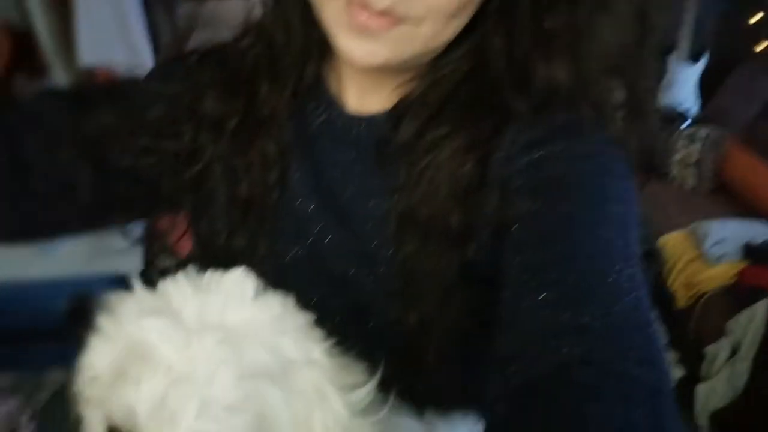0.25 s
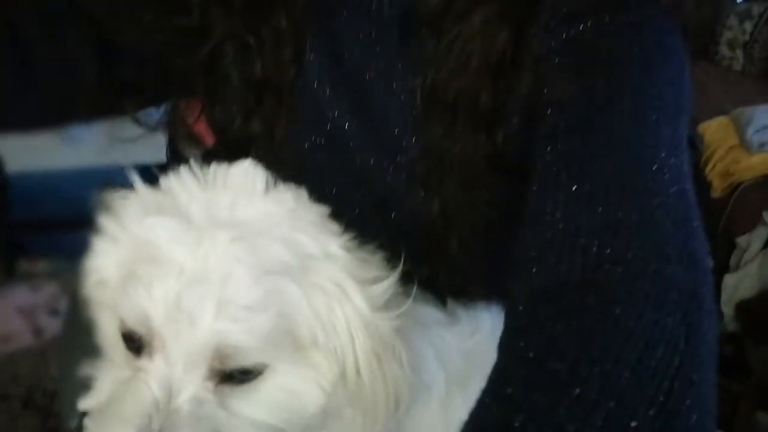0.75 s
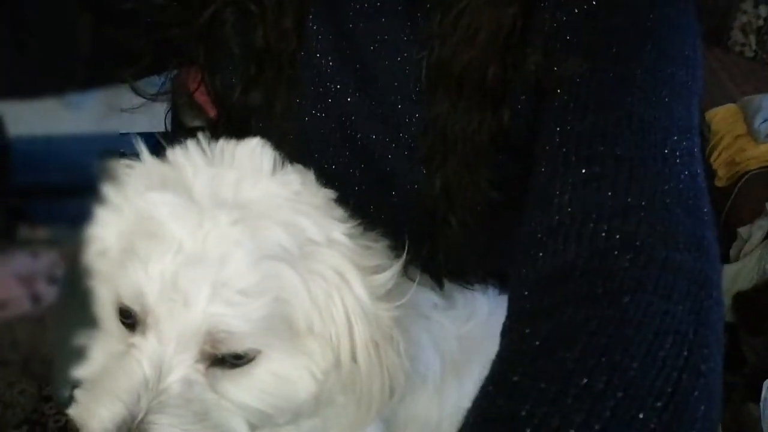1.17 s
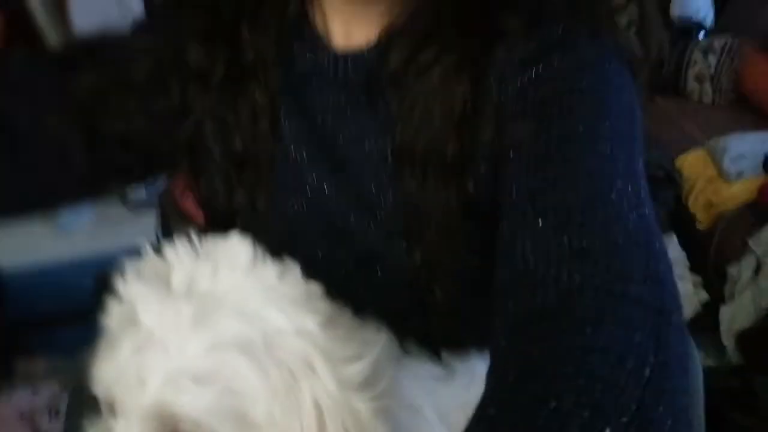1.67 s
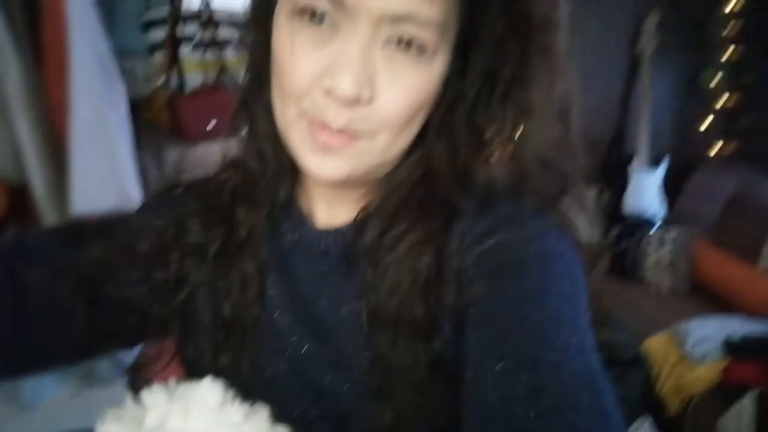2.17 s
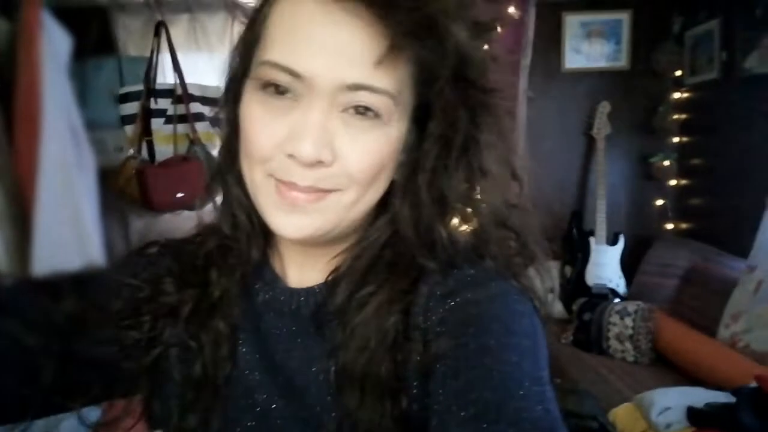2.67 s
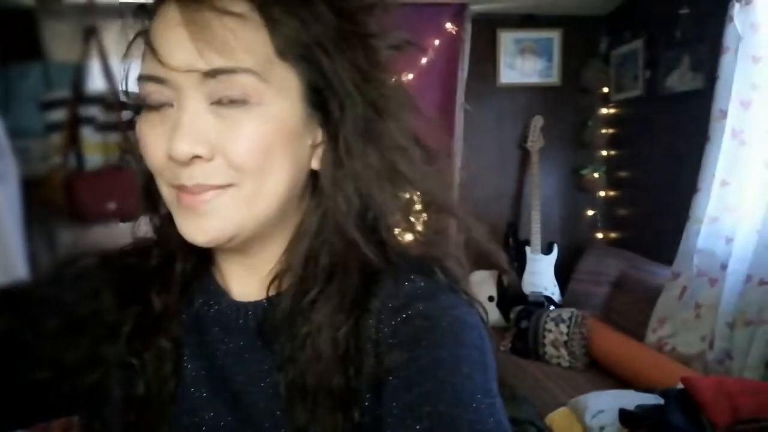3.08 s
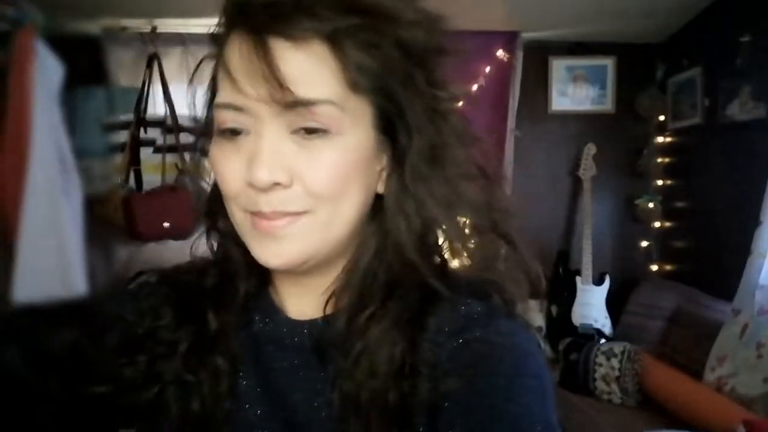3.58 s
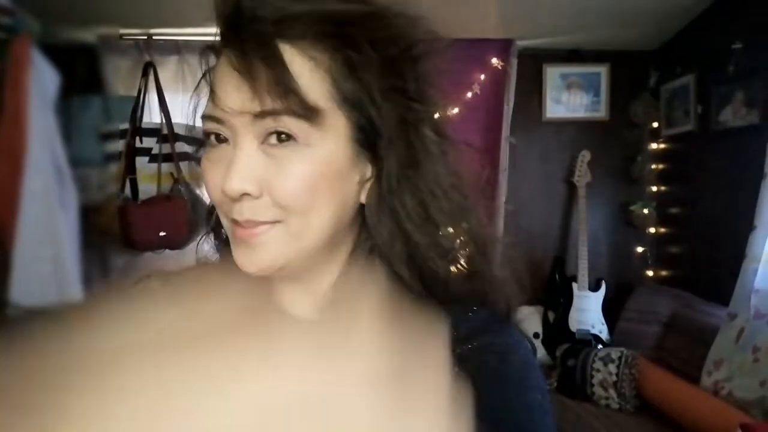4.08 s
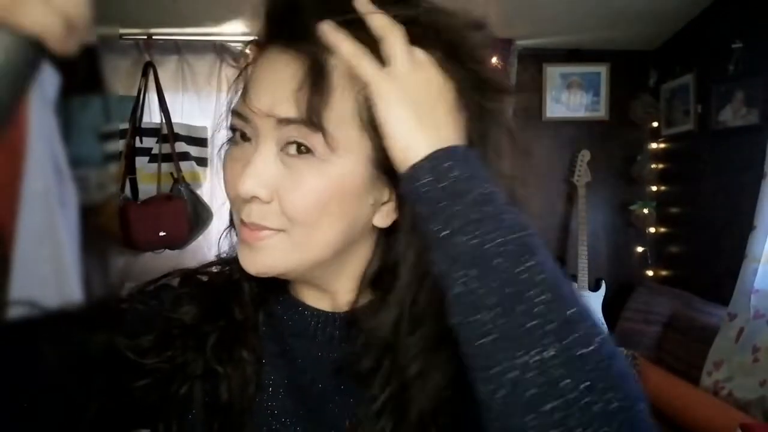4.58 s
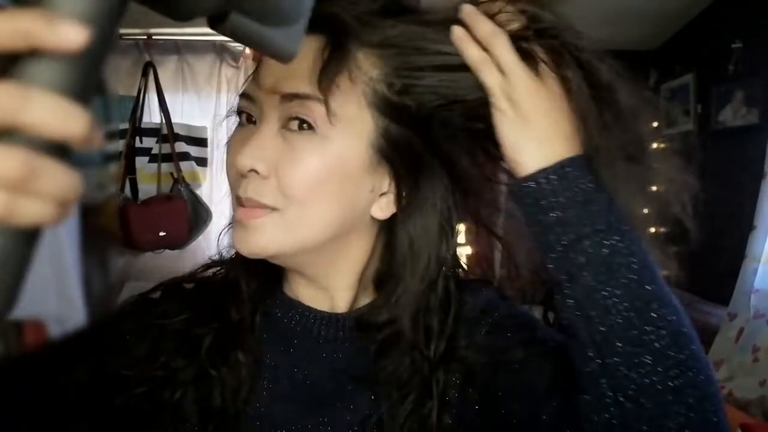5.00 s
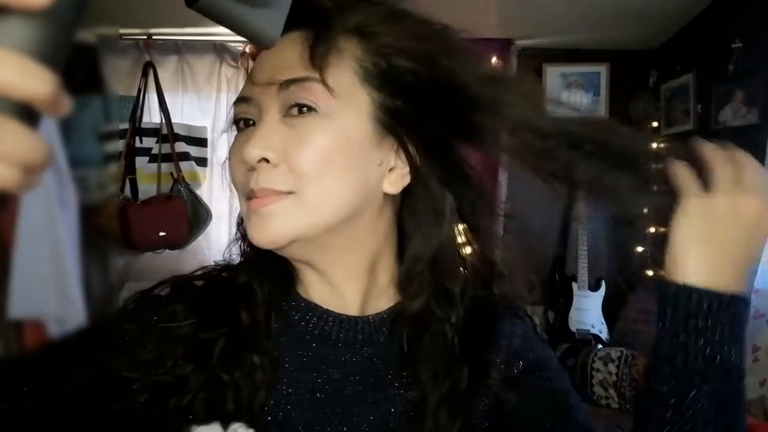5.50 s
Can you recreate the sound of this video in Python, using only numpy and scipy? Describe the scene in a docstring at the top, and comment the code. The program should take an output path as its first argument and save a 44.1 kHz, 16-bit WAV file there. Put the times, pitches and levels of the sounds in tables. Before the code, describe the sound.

A handheld hair dryer is already running at the start and blows without a break for nearly six seconds. It is close to the microphone and slightly to the left, in a softly furnished room with little echo. The main sound is a broad, hissing rush of air with a slight flutter and a faint low hum. A thin, high motor whine sits on top, almost constant in pitch but wavering in strength. For the first second and a half the dryer is held low. From about 1.5 to 2.5 seconds it rises, and the colour of the rush slides gently upward. The whine stands out more on the left between 2 and 3 seconds and again just after 4. From about 4.5 seconds the dryer is up at the hair, the rush a little fuller, and the whine leans briefly right around 5 seconds. It is still blowing at the end.

```python
"""Hair dryer in a softly furnished room

A hair dryer blows to the left of a hand-held pair of microphones, so its rush of air
reaches the left one first. As hand, dryer and body move, nearby echoes shift and
bands of the rush swell and fade. The motor adds a thin, high whine on top."""
import sys
import numpy as np
from scipy import signal
from scipy.io import wavfile

SR = 44100
rng = np.random.default_rng(int(sys.argv[2]) if len(sys.argv) > 2 else 0)


def to_wav(s):
    """Save 16-bit WAV."""
    ch = np.atleast_2d(s).T  # columns
    pcm = np.round(np.clip(ch, -1, 1) * 32767)  # PCM
    wavfile.write(sys.argv[1], SR, pcm.astype(np.int16))


N = 253134

# Shorter echo paths push the peaks and dips in the sound upward: time_s, frequency_factor
ECHO_SLIDE = [(1.65, 0.987), (2.0, 1.033), (2.5, 1.124)]


def air_rush():
    """Swirling air makes noise, which reaches each microphone both directly and from all over the room."""
    # Tone of the rush, before its overall level is set: frequency_hz, left_db, right_db
    tone = [(40, -77, -82), (110, -80, -79), (221, -70.5, -70.5), (330, -78, -78.5), (478, -73.5, -76),
            (802, -64.0, -74.5), (1586, -59, -57.5), (2680, -63.5, -66.5), (3560, -58.5, -62),
            (5810, -67.5, -68.5), (7630, -63, -66.5), (10320, -63, -58.5), (12600, -60, -69.5),
            (15500, -66.5, -80)]
    # Low ringing of motor and casing, alike on both sides: frequency_hz, width_hz, boost_db
    resonances = [(102, 24, 7), (188, 28, -4.5), (324, 37, 8.5)]
    # Direct part of the rush, and the extra lead the casing gives the left side:
    # frequency_hz, share_0_to_1, lead_radians
    direct_sound = [(60, .99, 0), (200, .93, -.1), (300, .92, .05), (500, .78, .9), (620, .5, .4),
                    (800, .68, -.1), (1300, .7, -.4), (1450, .8, -1.7), (1750, .8, -1.5), (1900, .6, -.2),
                    (2150, .65, -.9), (3150, .75, .4), (3600, .7, 0), (4000, .75, .8), (4600, .6, -.3),
                    (8860, .62, 0), (15000, .35, .5)]
    # How late the right side hears the dryer held low, at mid height and at the hair: lag_ms
    place_lag_ms = [0.19, 0.266, 0.14]
    rush_db, frames = -32, dict(nperseg=2048, noverlap=1536)
    hz, t, (shared_noise, *room_noise) = signal.stft(rng.standard_normal((3, N)), SR, **frames)
    hz = hz[:, None]
    lag_s = place_lag_ms @ place_shares(t) / 1000
    right_delay = np.exp(-2j * np.pi * hz * lag_s - 1j * read_curve(direct_sound, hz, column=2))
    paths = [nearby_echoes(hz, t), right_delay * nearby_echoes(hz, t)]
    direct = np.clip(read_curve(direct_sound, hz), 0, 1)
    flutter_db = jet_flutter_db(hz, t)
    ringing_db = sum(db * bell(hz, centre, width) for centre, width, db in resonances)
    sides = []
    for side in range(2):
        air = np.sqrt(direct) * paths[side] * shared_noise + np.sqrt(1 - direct) * room_noise[side]
        tone_db = read_curve(tone, hz, column=side + 1) + ringing_db
        sides.append(air * gain_of(tone_db + swells_db(side, hz, t) + flutter_db))
    sides[0] = sides[0] * body_echo(hz, t)
    sound = signal.istft(np.array(sides), SR, **frames)[1][:, :N]
    return gain_of(rush_db) * sound / np.sqrt(np.mean(sound ** 2))


def jet_flutter_db(hz, t):
    """Each half octave of the air jet flutters on its own."""
    bands_hz = 700 * 2 ** (np.arange(10) / 2)
    return .7 * sum(drift(t, top_hz=60) * bell(hz, centre, centre / 8) for centre in bands_hz)


def motor_whine():
    """The slots of the spinning rotor make tones; standing waves fade each one separately on each side."""
    # Main whine, at four times the slot tone's pitch: time_s, left_db, right_db, right_lag_ms
    main_whine = [(0, -48.5, -52, .21), (.2, -47.5, -48.5, .195), (.6, -51, -49.5, .17),
                  (1.05, -47.5, -48.5, .205), (1.5, -48.5, -50, .2), (1.75, -46.5, -47, .235),
                  (2.1, -41.5, -48, .21), (2.25, -46, -51, .2), (2.5, -42, -54, .205),
                  (2.65, -41.5, -47, .26), (3.03, -42, -44.5, .265), (3.15, -49, -51, .272),
                  (3.65, -45.5, -52, .235), (4.15, -38.5, -52, .182), (4.6, -47, -48.5, .158),
                  (5.1, -52, -45, .103), (5.74, -47.5, -48.5, .12)]
    # Its pitch sags as the motor works harder: time_s, pitch_hz
    pitch_curve = [(0, 7578), (.85, 7578.5), (1.25, 7574.5), (4.05, 7571), (5.1, 7560), (5.5, 7564)]
    # Ripple in the mains power adds a tone on either side of it: offset_hz, relative_db
    ripple_tones = [(-100, -14), (100, -18)]
    # Weaker multiples of the slot tone: multiple, left_db, right_db
    slot_tones = [(1, -54, -57), (2, -61, -62), (6, -60, -64), (8, -59, -76)]
    t = np.arange(N) / SR
    slow_t = np.arange(0, N + 512, 512) / SR  # coarse steps for slow changes
    times_s, *level_db, lag_ms = np.transpose(main_whine)
    pitch_hz = np.interp(slow_t, *np.transpose(pitch_curve)) + .8 * drift(slow_t, top_hz=6)
    cycles = np.cumsum(np.interp(t, slow_t, pitch_hz)) / SR
    lag_cycles = np.interp(t, times_s, lag_ms) / 1000 * pitch_hz.mean()
    sound = np.zeros((2, N))
    for side in range(2):
        phase = 2 * np.pi * (cycles - side * lag_cycles)
        main_db = np.interp(slow_t, times_s, level_db[side])
        tones = [(phase, main_db + 2.2 * drift(slow_t, top_hz=12))]
        for offset_hz, relative_db in ripple_tones:
            ripple_db = main_db + relative_db + 3 * drift(slow_t, top_hz=2)
            tones.append((phase + 2 * np.pi * offset_hz * t, ripple_db))
        for multiple, *slot_db in slot_tones:
            fade_db = swells_db(side, multiple / 4 * pitch_hz, slow_t) + 3.5 * drift(slow_t, top_hz=3)
            tones.append((multiple / 4 * phase, slot_db[side] + fade_db))
        sound[side] = sum(np.interp(t, slow_t, gain_of(db)) * np.sin(angle) for angle, db in tones)
    return np.sqrt(2) * sound


def swells_db(side, hz, t):
    """Nearby surfaces boost or cancel bands of sound as the dryer moves (side 0 is left, 1 is right)."""
    # Peaks and dips in each of the dryer's three places: frequency_hz, width_hz, left_db, right_db
    held_low = [(460, 27, 11, 9), (638, 16, -7, 3.8), (1080, 19, -16, 2), (1170, 34, 1, 2.5),
                (1466, 79, -6, -8.5), (1670, 150, 1.5, 3.5), (1980, 33, 6, 4.5), (2780, 40, -13, -5),
                (3000, 70, 4.5, 3), (4280, 130, 4, -3), (6100, 740, -4, -3), (9740, 190, -7.5, -1.5),
                (13300, 1500, 2.5, 1)]
    mid_height = [(623, 13, 8, 1), (808, 105, 6.5, 3.5), (1142, 33, -7.5, -1), (1242, 43, 6.5, -1),
                  (1443, 85, -7, -7.5), (1750, 73, -7, 0), (1966, 96, 3.5, -13), (2050, 43, 11.5, -0.5),
                  (2320, 260, -3, -2), (3225, 96, 7.5, 6.5), (3450, 82, 7, -0.5), (4230, 53, -5, 2.5),
                  (4050, 46, 7.5, 5), (5150, 62, -16, -14), (10960, 370, 8, 2.5), (12950, 570, -4.6, -2.0)]
    at_the_hair = [(315, 36, 7, 5), (760, 19, 5, 3), (907, 113, 6, 5.5), (1123, 26, 3, 9), (1620, 45, 7, 4),
                   (2067, 45, 5.5, 12), (2540, 100, 3.5, 6.5), (3700, 34, 13, 2), (3760, 63, -12, 6),
                   (4170, 82, 9, -4), (4850, 78, 6, 7.5), (5590, 280, 6, 6.5), (11000, 1400, 2.5, 2.5),
                   (14600, 1800, -5, -1)]
    # Brief swells and dips on the way: middle_s, half_length_s, frequency_hz, width_hz, left_db, right_db
    passing_bands = [(0.15, 0.23, 4080, 70, 5, 11), (1.05, 0.45, 4313, 50, 9.5, -4),
                     (0.853, 0.42, 4590, 60, -9, -2), (1.0, 0.38, 2370, 141, -5, -0.5),
                     (1.0, 0.35, 3600, 45, 2, 7), (1.29, 0.17, 2740, 98, 5.9, 4),
                     (1.89, 0.1, 3220, 347, 5, 3), (2.1, 0.14, 1740, 59, -10, 0),
                     (2.3, 0.3, 1400, 50, 5, -2), (2.606, 0.21, 1710, 39.3, -13, 7),
                     (2.6, 0.079, 3600, 60, 2, 9), (3.203, 0.5, 10000, 614, 6.5, 0.5),
                     (3.45, 0.2, 11000, 400, 1, 0.5), (3.598, 0.16, 4370, 60, -8, -1),
                     (4.102, 0.2, 9400, 636, 1.5, 3.5), (4.0, 0.3, 10300, 150, 1, 4),
                     (4.3, 0.52, 1530, 94, -6.5, -2.5), (4.35, 0.11, 1050, 60, 7.5, 7),
                     (4.4, 0.29, 3420, 80, 7, 0), (4.4, 0.14, 11550, 156, 7.5, -9),
                     (4.448, 0.25, 3930, 60, 10, 1), (4.604, 0.14, 153, 40, 9, 7.5),
                     (5.446, 0.21, 4270, 110, 1.5, -4), (5.05, 0.21, 1740, 250, 1.5, -0.5),
                     (4.8, 0.23, 965, 49.7, 5.5, 0), (5.35, 0.57, 840, 50, 3.5, 7),
                     (5.5, 0.4, 10350, 170, 3.5, 6.5)]
    slide = np.interp(t, *np.transpose(ECHO_SLIDE))  # moves the peaks of the two lower places
    final_slide = ECHO_SLIDE[-1][1]
    places = [(held_low, hz / slide), (mid_height, hz * final_slide / slide), (at_the_hair, hz)]
    change_db = 0
    for share, (peaks, slid_hz) in zip(place_shares(t), places):
        change_db += share * sum(db[side] * bell(slid_hz, centre, width) for centre, width, *db in peaks)
    for middle_s, half_length_s, centre, width, *db in passing_bands:
        flat_topped_fade = np.exp(-((t - middle_s) / half_length_s) ** 4 / 4)
        change_db += db[side] * bell(hz, centre, width) * flat_topped_fade
    return change_db


def place_shares(t):
    """How much the dryer is in each of its three places; the shares add up to 1."""
    # The dryer's route (0 held low, 1 at mid height, 2 raised to the hair): time_s, place_0_to_2
    route = [(0.0, 0.47), (0.6, 0.058), (1.5, 0.14), (2.0, 0.3), (2.6, 0.59), (2.95, 0.89), (3.7, 1.19),
             (4.2, 1.51), (4.7, 1.89), (5.74, 1.65)]
    place = np.interp(t, *np.transpose(route))
    return np.clip(1 - abs(place - np.arange(3)[:, None]), 0, 1)


def body_echo(hz, t):
    """A hand or shoulder near the left microphone bounces treble into it."""
    # The changing echo: time_s, delay_ms, level_db
    bounce = [(0, 1.93, -11), (1.15, 2.0, -7), (1.6, 1.96, -8), (2.3, 1.76, -11), (3.5, 1.76, -9),
              (5.74, 1.5, -16)]
    times_s, delay_ms, level_db = np.transpose(bounce)
    echo = (np.interp(t, times_s, delay_ms), np.interp(t, times_s, level_db))
    return echo_filter(hz, [echo], scatter_above_hz=8000)


def nearby_echoes(hz, t, echo_db=-12.5, flicker_db=4, wander_ms=0.04):
    """Hands, hair and furniture close by give short echoes that shorten together, wander and flicker."""
    slide = np.interp(t, *np.transpose(ECHO_SLIDE))
    echoes = []
    for base_ms in rng.uniform(1.5, 9, size=10):
        delay_ms = base_ms / slide + wander_ms * drift(t, top_hz=1.52)
        echoes.append((delay_ms, echo_db + flicker_db * drift(t, top_hz=8)))
    return echo_filter(hz, echoes, scatter_above_hz=600)


def echo_filter(hz, echoes, scatter_above_hz):
    """Direct sound plus echoes, at the same average power; small objects do not bounce low notes."""
    scatter = 1 - bell(hz, 0, scatter_above_hz)
    reflected = sum(gain_of(db) * np.exp(-2j * np.pi * hz * ms / 1000) for ms, db in echoes)
    echo_power = sum(gain_of(2 * db) for _, db in echoes)
    return (1 + scatter * reflected) / np.sqrt(1 + scatter ** 2 * echo_power)


def drift(t, top_hz, count=12):
    """A random wobble of typical size 1: a sum of sine waves, the slowest strongest."""
    hz = top_hz * np.geomspace(.1, 1, count)
    waves = np.sin(2 * np.pi * (hz[:, None] * t + rng.random((count, 1)))) / np.sqrt(hz)[:, None]
    return waves.sum(0) / np.sqrt((.5 / hz).sum())


def read_curve(points, hz, column=1):
    """Read between a table's rows, with frequency spaced like musical pitch."""
    columns = np.transpose(points)
    return np.interp(np.log(hz + 1), np.log(columns[0] + 1), columns[column])


def bell(x, centre, width):
    """A smooth hump of height 1."""
    return np.exp(-((x - centre) / width) ** 2 / 2)


def gain_of(db):
    """Turn decibels into a multiplier."""
    return 10 ** (np.asarray(db) / 20)


def scene():
    """The running dryer: rushing air with the motor on top."""
    return air_rush() + motor_whine()


def record(dry, cutoff_hz=15500):
    """Cut away the very highest treble."""
    low_pass = signal.firwin(2047, cutoff_hz, window=("kaiser", 10), fs=SR)
    return signal.oaconvolve(dry, low_pass[None], "same")


dry = scene()
out = record(dry)
to_wav(out)
```